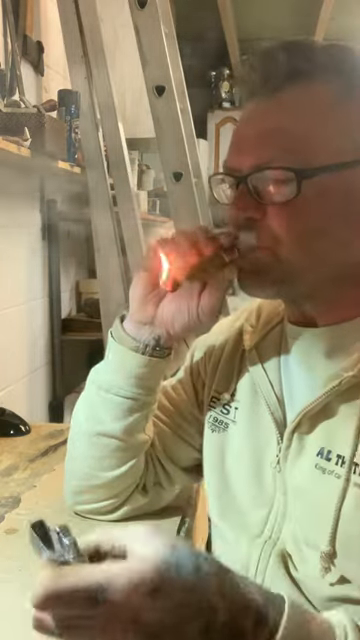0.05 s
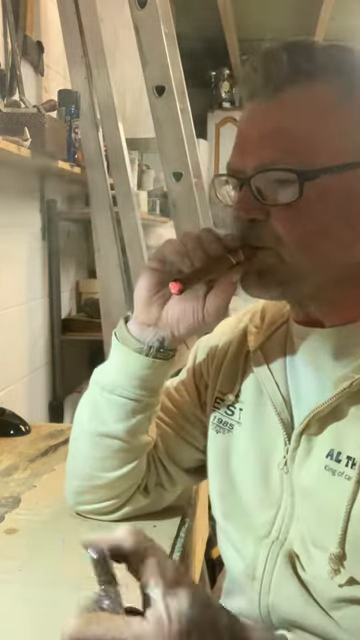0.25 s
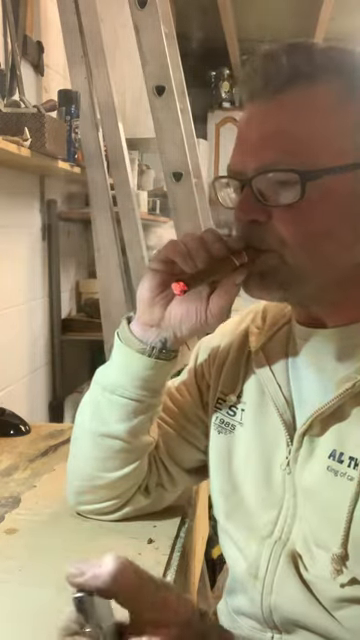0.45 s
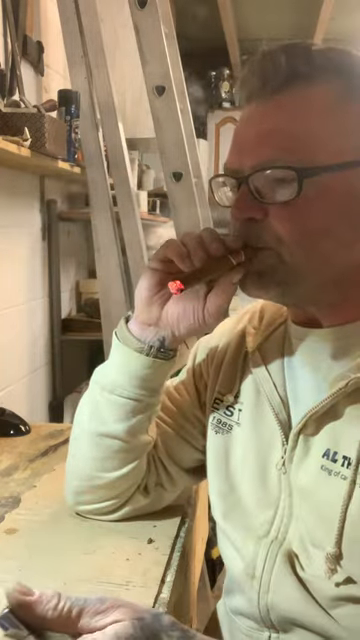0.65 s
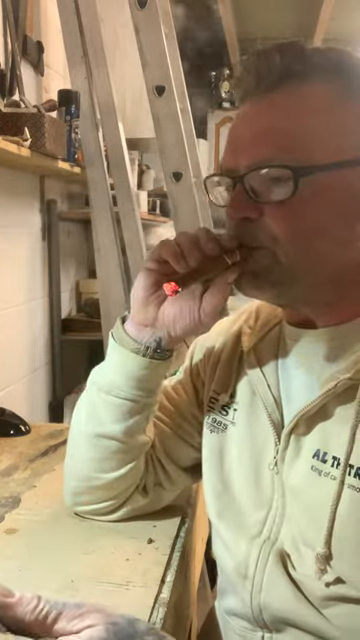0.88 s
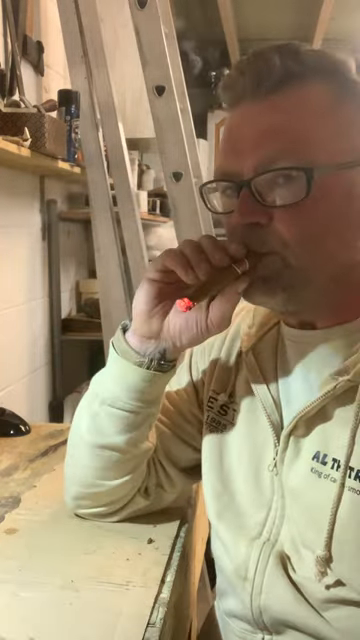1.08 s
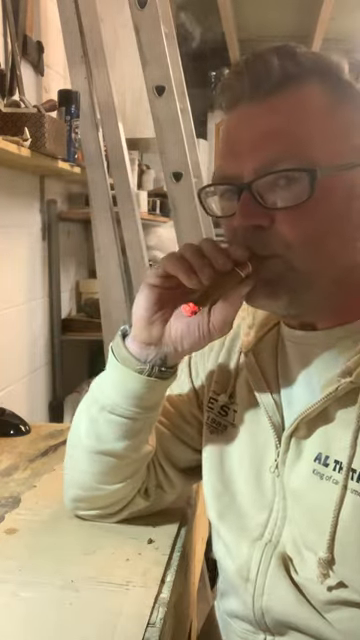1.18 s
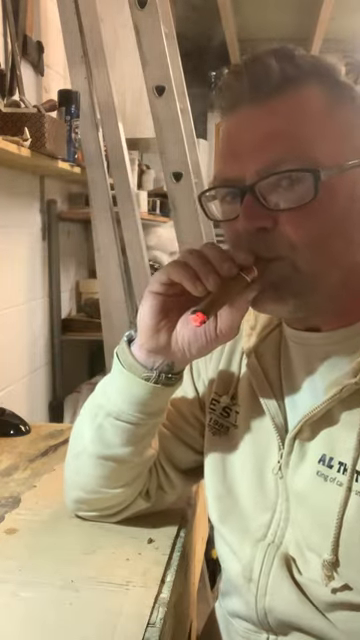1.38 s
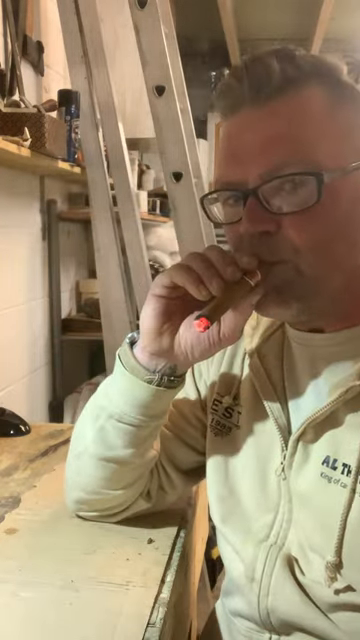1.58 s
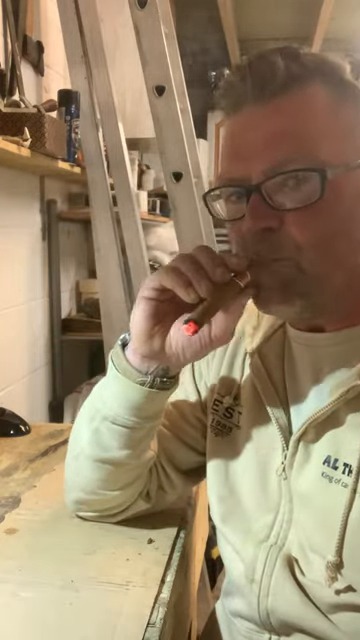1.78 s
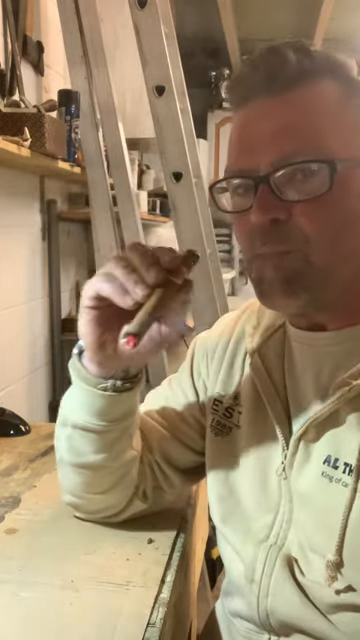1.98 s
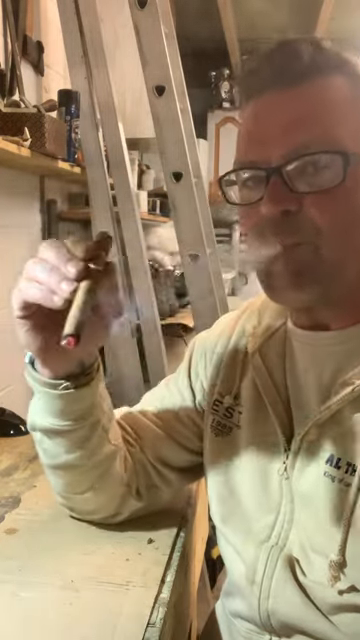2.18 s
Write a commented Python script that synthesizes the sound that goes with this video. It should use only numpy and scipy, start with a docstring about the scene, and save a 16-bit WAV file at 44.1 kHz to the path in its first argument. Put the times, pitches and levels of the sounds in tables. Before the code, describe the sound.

Sharp metallic clack of a lighter closing, then faint taps as it is laid on a bench

```python
"""Room tone with a faint drone, from filtered noise, lasts throughout a scene in a small workshop.
A sleeve rustles (shaped noise); a metal lighter's hinge scrapes (impulses ringing metal modes),
the cam flips the lid and the lid claps onto the case (decaying modes with noisy cracks).
The lighter is then laid on the bench: light taps (short noise bursts) and a skid (sparse impulses).
Rustles and low bench rumbles (slow swells of noise) come and go before and after the closing."""
import sys
import numpy as np
from scipy import signal
from scipy.fft import rfft, irfft
from scipy.io import wavfile

SR = 44100
rng = np.random.default_rng(int(sys.argv[2]) if len(sys.argv) > 2 else 0)


def unload_wav(signal):
    """Save mono or channel-first audio to the path in sys.argv[1] as 16-bit WAV at rate SR, clipped to [-1, 1]."""
    wavfile.write(
        sys.argv[1],
        SR,
        np.round(np.clip(np.atleast_2d(signal).T, -1, 1) * 32767).astype(np.int16),
    )


N = 99225
T = np.arange(N) / SR
FREQS = np.fft.rfftfreq(N, 1 / SR) + 1e-3  # Hz; the offset keeps the logarithm finite


def undb(db):
    """Logarithmic level: decibels become an amplitude gain."""
    return 10 ** (np.asarray(db) / 20)


def curve(points, column=1):
    """Spectral interpolation: a table column is joined linearly over log frequency."""
    table = np.array(points, float)
    return np.interp(np.log(FREQS), np.log(table[:, 0]), table[:, column])


def colour(x, points, tilt_db=0):
    """Linear filtering: a spectrum and a tilt per octave above 500 Hz, scaled to rms 1."""
    octaves = np.log2(np.maximum(FREQS, 500) / 500)
    gain = undb(curve(points) + tilt_db * octaves)
    x = irfft(rfft(x) * gain, N)
    return x / x.std()


def noise(points, tilt_db=0):
    """Stochastic excitation: white noise is coloured and scaled to rms 1."""
    return colour(rng.standard_normal(N), points, tilt_db)


def fade(start, t60):
    """Exponential damping: amplitude falls by 60 dB in t60 seconds from the start."""
    return (T >= start) * np.exp(-np.log(1000) * np.maximum(T - start, 0) / t60)


def swell(centre, half):
    """Gaussian envelope: a smooth rise and fall."""
    return np.exp(-.5 * ((T - centre) / half) ** 2)


def delay(x, seconds):
    """Fourier shift: a linear phase gives a delay of any fraction of a sample."""
    return irfft(rfft(x) * np.exp(-2j * np.pi * FREQS * seconds), N)


CLICK_SIZE = .7  # first touch, relative to the root energy of the chatter's envelope


def burst(start, t60, points, tilt_db):
    """Impulsive contact: a sharp first touch precedes a dying chatter of tiny contacts."""
    shape = fade(start, t60)
    contacts = shape * rng.standard_normal(N)
    contacts[int(start * SR)] += CLICK_SIZE * np.linalg.norm(shape)
    return colour(contacts, points, tilt_db) * shape.std()


# Left-right likeness of diffuse sound: (frequency [Hz], correlation [-1 to 1])
DIFFUSE_CORRELATION = [(50, .99), (130, .87), (500, .85), (800, .5), (1300, .4), (2300, .5), (3900, .35),
                       (4900, .88), (6000, .55), (7000, .85), (9500, .995), (10600, .98), (12300, .6),
                       (14000, .95)]


def diffuse():
    """Spatial coherence: shared and opposed noise spectra set the likeness of two channels."""
    c = np.clip(curve(DIFFUSE_CORRELATION), -1, 1)
    weights = np.sqrt([(1 + c) / 2, (1 - c) / 2])
    mid, side = rfft(rng.standard_normal((2, N))) * weights
    return np.array([mid + side, mid - side])


# Relative spectrum of the room tone: (frequency [Hz], density [dB per Hz])
TONE_SPECTRUM = [(20, -8), (40, -17.5), (58, 5), (76, -1.5), (98, -9.5), (128, -4), (190, -14), (300, -7.5),
                 (420, -8), (530, -11), (650, -14), (1000, -18), (1450, -19.5), (2100, -25.5),
                 (3200, -33.5), (5000, -43), (8000, -48), (10300, -50), (14000, -53), (15500, -64)]
# Channel imbalance of the room tone: (frequency [Hz], left minus right [dB])
TONE_LEFT_EXCESS = [(50, 1), (110, 0.5), (200, 10), (380, 0.9), (700, 0)]
# Narrow droning bands: (frequency [Hz], width [Hz], peak over the tone [dB])
DRONE_BANDS = [(285, 12, 3.5), (325.6, 10, 5), (401.5, 10, 9), (461.2, 30, 8), (534, 10, 10),
               (736.5, 19, 8.5)]
TONE_DB, TONE_WAVER_DB = -53.5, 1  # rms level, standard deviation of the waver's points


def room_tone():
    """Stationary noise with narrow-band resonances: dull, faintly droning, leaning to the left."""
    drone = sum(db / (1 + (2 * (FREQS - hz) / width) ** 2) for hz, width, db in DRONE_BANDS)
    lean = np.array([[.5], [-.5]]) * curve(TONE_LEFT_EXCESS)
    tone = irfft(diffuse() * undb(curve(TONE_SPECTRUM) + drone + lean), N)
    # The level drifts slowly between random points.
    waver = np.interp(T, np.linspace(0, T[-1], 24), rng.standard_normal(size=24))
    return tone / tone.std() * undb(TONE_DB + TONE_WAVER_DB * waver)


# Arm movements on the bench: (time [s], half length [s], level [dB])
BENCH_RUMBLES = [(.185, 0.023, -54), (0.296, .025, -52.5), (0.847, 0.035, -53.5), (0.998, 0.048, -57),
                 (2.053, 0.092, -50), (2.161, 0.033, -55)]
# Relative spectrum of the rumble: (frequency [Hz], level [dB])
RUMBLE_SPECTRUM = [(15, -21), (30, -2.5), (40, -9), (55, 4), (75, -3.5), (115, -18.5), (250, -41),
                   (1000, -77)]


def bench():
    """Structure-borne sound: arm movements reach the phone through the bench as low rumble."""
    envelope = sum(undb(db) * swell(s, half) for s, half, db in BENCH_RUMBLES)
    return noise(RUMBLE_SPECTRUM) * envelope


# Rustles of sleeve and hand: (time [s], half length [s], level [dB], brightness [dB per octave])
SLEEVE_RUSTLES = [(0.082, 0.033, -61.5, 0.5), (.67, 0.026, -62, -3.5), (0.76, 0.063, -65, -1),
                  (0.914, 0.041, -56.5, -2), (1.024, 0.022, -55, -3.5), (1.708, 0.017, -69, 12),
                  (2.124, 0.037, -62, 0)]
# Relative spectrum of a rustle before brightness: (frequency [Hz], level [dB])
RUSTLE_SPECTRUM = [(500, 13), (1500, 9), (3500, 3.5), (5000, -0.5), (7000, -4), (8500, -12), (10300, -4),
                   (13000, -21), (16000, -38.5)]


def sleeve():
    """Friction noise: cloth and skin brush softly, with a slightly grainy level."""
    steps_db = 2.5 * np.repeat(rng.standard_normal(N // 100 + 1), 100)[:N]
    brushes = sum(undb(db) * swell(s, half) * noise(RUSTLE_SPECTRUM, tilt_db)
                  for s, half, db, tilt_db in SLEEVE_RUSTLES)
    return undb(steps_db) * brushes


# Relative spectrum of bench contacts, skid and taps, before tilt: (frequency [Hz], level [dB])
TAP_SPECTRUM = [(300, -25), (1000, -13), (1800, -5), (2800, 2), (3500, 0), (4000, 6.5), (4350, 1),
                (4900, -12), (6100, -16.5), (6850, 3.5), (8500, -17), (10500, -1.5), (12100, -26),
                (15000, -29), (16400, -40)]
SLIDE_S, SLIDE_T60_S, SLIDE_DB = .834, 0.1, -50.5
SLIDE_TILT_DB, GRITS_PER_S = -7, 570  # dB per octave, mean rate of impulses


def slide():
    """Random impulse excitation: the lighter skids briefly over grit on the bench as it settles."""
    grits = (rng.random(N) < GRITS_PER_S / SR) * rng.standard_normal(N)
    skid = colour(grits, TAP_SPECTRUM, SLIDE_TILT_DB)
    return undb(SLIDE_DB) * fade(SLIDE_S, SLIDE_T60_S) * skid


# Taps of lighter and fingers on the bench: (time [s], level [dB], brightness [dB per octave])
BENCH_TAPS = [(0.8255, -54, 4), (0.8268, -43.5, -0.5), (0.829, -48, -4), (0.8418, -54, -5),
              (0.9092, -51, 10), (0.923, -60, -7), (1.0277, -62, 7), (1.231, -64, 24), (2.0574, -67, 22)]
TAP_T60_S = 0.018


def taps():
    """Damped impact: the hand makes each little contact die away quickly."""
    return sum(undb(db) * burst(s, TAP_T60_S, TAP_SPECTRUM, tilt_db)
               for s, db, tilt_db in BENCH_TAPS)


# Modes of lid and case, before brightness and blow strength:
# (frequency [Hz], t60 [s], level with open lid [dB], level with shut lid [dB])
METAL_MODES = [(1320, .026, -39, -31), (1665, .02, -28, -44), (1850, .012, -31, -42),
               (2250, .018, -30, -41), (2500, .042, -24, -36), (2598, .07, -21, -33),
               (2760, .022, -25.5, -30), (2925, .036, -29, -35), (3647, .035, -28, -39),
               (3736, .04, -31, -41), (4400, .015, -25, -36), (4650, .015, -28, -37), (5270, .02, -36, -22),
               (5365, .03, -35, -21), (5490, .02, -33, -22), (5680, .022, -29, -28),
               (5797, .026, -22.5, -36), (6430, .014, -28, -26), (6580, .016, -35, -28),
               (7000, .014, -31, -24), (7600, .012, -33, -24), (9350, .006, -22, -16),
               (10220, .008, -29, -15), (13100, .014, -44, -35), (14330, .013, -42, -28)]
CONTACT_S = 0.0002  # time constant of the onset


def ring(shut, tilt_db=0):
    """Modal superposition: damped sines whose balance follows the lid (0 open, 1 shut) and tilt."""
    shut = np.clip(shut, 0, 1)
    t = T[:SR // 5]
    out = np.zeros(len(t))
    for k, (hz, t60, open_db, shut_db) in enumerate(METAL_MODES):
        level_db = open_db + shut * (shut_db - open_db) + tilt_db * np.log2(hz / 3000)
        decay = np.exp(-np.log(1000) * t / t60)
        sign = (-1) ** k  # neighbouring modes start in opposite directions
        out += sign * undb(level_db) * decay * np.sin(2 * np.pi * hz * t)
    return out * (1 - np.exp(-t / CONTACT_S))


# Strength of the slips before they ring the metal: (time [s], level [dB])
HINGE_SLIPS = [(.18, -57.5), (.189, -35), (.198, -39), (0.203, -21.5), (0.21, -18.5), (0.216, -25),
               (.234, -36), (.251, -26), (.257, -35.5)]
SLIPS_PER_S, SWING_SHUT = 2000, 0.3  # mean rate; lid setting (0-1) of the ring at the end


def hinge():
    """Stick-slip friction: tiny slips of the cam ring the metal, whose modes shift as the lid swings."""
    times, db = np.array(HINGE_SLIPS).T
    strength = np.interp(T, times, undb(db), left=0, right=0)
    slips = (rng.random(N) < SLIPS_PER_S / SR) * rng.choice([-1, 1], N) * strength
    # The ring crosses over from the strongest slip to the last.
    swing = np.interp(T, [times[np.argmax(db)], times[-1]], [0, 1])
    open_ring = signal.fftconvolve(slips * (1 - swing), ring(0))
    closing_ring = signal.fftconvolve(slips * swing, ring(SWING_SHUT))
    return (open_ring + closing_ring)[:N]


# Blows of the lid:
# (time [s], ring level [dB], crack level [dB], lid shut [0-1], brightness [dB per octave])
LID_BLOWS = [(0.1866, -29, -37.5, .3, -3), (0.2128, 0.5, -19.5, 0, 2), (0.2164, -7, -35, 0.05, 1),
             (0.2577, -0.5, -20, 0.97, 0.5), (0.261, -18.5, -28.5, 0.9, 1)]
# Relative spectrum of the crack before brightness: (frequency [Hz], level [dB])
CRACK_SPECTRUM = [(300, -46.5), (850, -32.5), (1300, -7), (3000, -3), (4100, 2.5), (7000, -5), (10300, 13),
                  (12000, -6.5), (15500, -13.5), (16400, -31)]
CRACK_T60_S = 0.014


def lid():
    """Impact excitation: each blow gives a short crack and rings the modes of lid and case."""
    out = np.zeros(N)
    for s, ring_db, crack_db, shut, tilt_db in LID_BLOWS:
        metal = ring(shut, tilt_db)
        start = int(s * SR)
        out[start:start + len(metal)] += undb(ring_db) * metal
        out += undb(crack_db) * burst(s, CRACK_T60_S, CRACK_SPECTRUM, tilt_db)
    return out


# Workshop reverberation by band: (centre frequency [Hz], t60 [s], level [dB])
ROOM_BANDS = [(302.4, 0.42, -6), (1430, .3, -6), (2720, 0.38, -6), (3585, 0.28, -5), (4050, 0.283, -4),
              (5390, 0.28, -7), (7850, 0.19, -18), (10400, .2, -18), (15000, 0.29, -19)]
# Echoes of near surfaces: (delay [s], level [dB])
NEAR_ECHOES = [(.0040, -15), (0.0098, -18), (0.0143, -23.5)]
ROOM_GAP_S, ROOM_BUILD_S = 0.00092, 0.0018  # silence before the tail, time constant of its rise


def workshop(x):
    """Room response: direct sound, discrete echoes and a diffuse tail with its own decay in each band."""
    wash, tail = diffuse(), 0
    build = 1 - np.exp(-np.maximum(T - ROOM_GAP_S, 0) / ROOM_BUILD_S)
    for k, (hz, t60, db) in enumerate(ROOM_BANDS):
        # Each band fades out towards its neighbours' centres.
        band = curve([(row[0], j == k) for j, row in enumerate(ROOM_BANDS)])
        shape = build * fade(0, t60)
        tail = tail + undb(db) * irfft(wash * band, N) * shape / np.linalg.norm(shape)
    near = x + sum(undb(db) * delay(x, s) for s, db in NEAR_ECHOES)
    return near + signal.fftconvolve(x[None], tail, axes=1)[:, :N]


def scene():
    """Superposition: the airborne sources share the room; rumble and room tone are added."""
    sources = lid() + hinge() + taps() + slide() + sleeve()
    return workshop(sources) + bench() + room_tone()


# Phase between the phone's two ports: (frequency [Hz], lag of the left channel [rad])
LEFT_PHASE_LAG = [(60, 0), (170, .15), (260, .9), (430, 1.3), (800, 2), (1500, 1.1), (2200, 1.7),
                  (3000, 2.1), (3700, 1.2), (4600, 2.9), (5400, 2.6), (6700, 1.5), (7700, 2.1), (8700, 2.9),
                  (10400, 3.35), (11500, 3.7), (13000, 5.6), (16000, 6.1)]
BASS_CUT_HZ, TOP_HZ = 24, 16500


def record(dry):
    """Interchannel phase and band limiting: the left lags, widening the image; bass and top are cut."""
    left = irfft(rfft(dry[0]) * np.exp(-1j * curve(LEFT_PHASE_LAG)), N)
    stereo = np.array([left, dry[1]])
    bass_cut = signal.butter(4, BASS_CUT_HZ, "high", fs=SR, output="sos")
    top_cut = signal.ellip(8, .2, 80, TOP_HZ, fs=SR, output="sos")
    return signal.sosfilt(top_cut, signal.sosfilt(bass_cut, stereo))


dry = scene()
out = record(dry)
unload_wav(out)
```